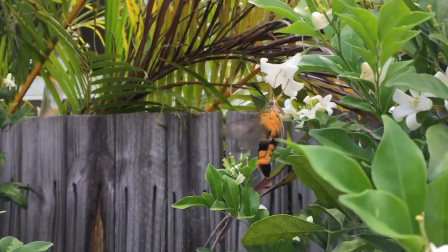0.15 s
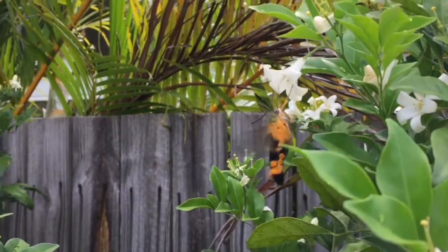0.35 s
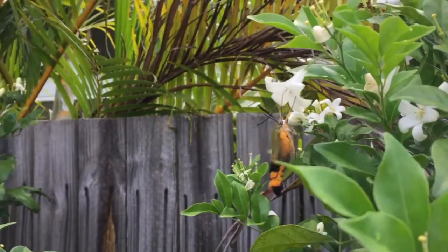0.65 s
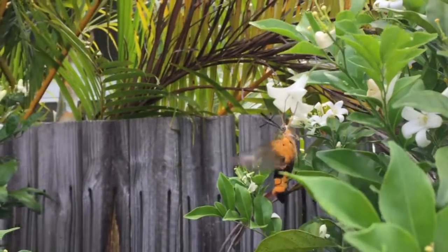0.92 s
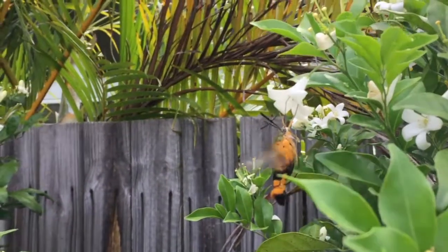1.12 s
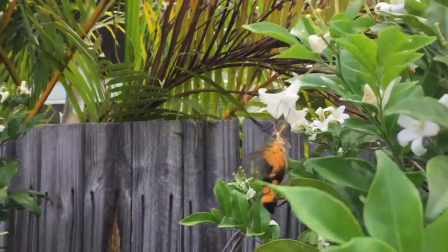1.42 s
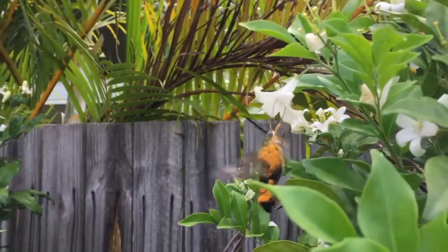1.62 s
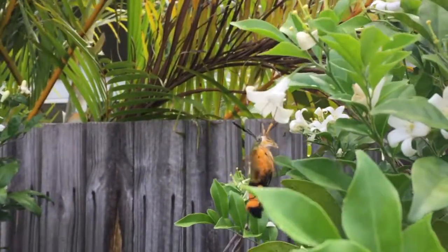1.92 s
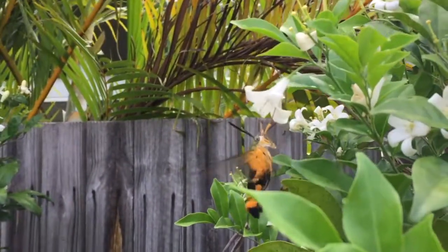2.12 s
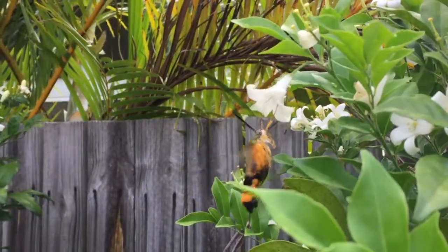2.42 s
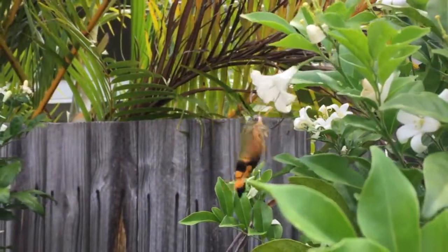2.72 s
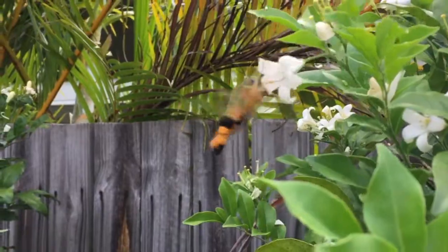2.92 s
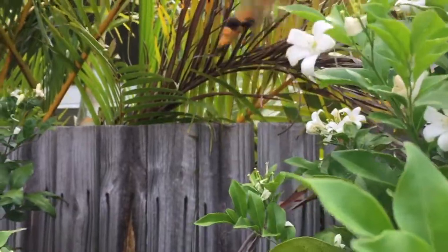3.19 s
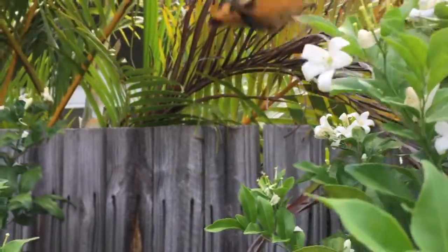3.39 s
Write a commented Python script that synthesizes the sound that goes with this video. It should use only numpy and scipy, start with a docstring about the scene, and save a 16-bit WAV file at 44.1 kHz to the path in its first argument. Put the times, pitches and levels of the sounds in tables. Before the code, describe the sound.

A moth's wings flutter with a low throb and dry ticks over a distant outdoor rumble.

```python
"""A flower garden: a hawk moth hovers, then lifts off, brushes the leaves and sweeps close by.
Each wingbeat pushes a pulse of air, heard as a low throb, and each stroke ends in a dry tick,
plainer as the moth nears. Behind it far traffic rumbles and swells, a motor hums and whines,
and insects give a few faint, thin calls over the hiss of still air."""
import sys
import numpy as np
from scipy import signal
from scipy.fft import rfft, irfft
from scipy.io import wavfile

SR = 44100
rng = np.random.default_rng(int(sys.argv[2]) if len(sys.argv) > 2 else 0)


def wrap_up_sound(samples):
    """Save the sound to the file named by the first command line argument, as 16-bit audio."""
    columns = np.atleast_2d(samples).T
    # keep every value between -1 and 1, then stretch to whole-number steps
    tamed = np.clip(columns, -1, 1)
    steps = np.round(tamed * 32767).astype(np.int16)
    wavfile.write(sys.argv[1], SR, steps)


N = 156555

# The pace of the wings: time_s, beat_rate_hz
WINGBEAT = [(0, 54.5), (2.3, 55), (2.65, 56.5), (2.9, 54.5), (3.0, 62), (3.07, 61.3), (3.13, 57.5),
            (3.21, 62.5), (3.29, 58.5), (3.38, 58.8), (3.44, 53), (3.47, 55), (3.51, 62), (3.55, 66)]
def wingbeats(downstroke_at_s=3.2028):
    """Running count of wingbeats, timed so that a downstroke lands on the hardest flick."""
    beats = np.cumsum(in_time(WINGBEAT)) / SR
    return beats + 1 - np.interp(downstroke_at_s, seconds(), beats) % 1


# The throb's swells and dips: time_s, level_db
THROB_LEVEL = [(0, -61), (2.65, -62.5), (2.86, -50.5), (3.0, -58), (3.2, -66), (3.36, -46.5), (3.45, -62),
               (3.52, -45.5), (3.55, -48)]
# Its harmonics, fundamental first: relative_level_db
THROB_HARMONICS = [-1.5, -5, -14, -20.5]
def wing_throb(sway_db=1.5):
    """The moth's low end: one pulse of air per beat, each harmonic wavering on its own."""
    phase = 2 * np.pi * wingbeats()
    throb = sum(-from_db(db + sway_db * drift(12)) * np.cos(k * phase)
                for k, db in enumerate(THROB_HARMONICS, 1))
    return from_db(in_time(THROB_LEVEL)) * rms_one(throb)


# The ticks build as the moth nears: time_s, level_db
TICK_LEVEL = [(0, -84.5), (2.2, -81.5), (2.6, -77), (2.75, -77.5), (2.97, -73.5), (3.06, -74), (3.14, -73),
              (3.24, -72), (3.31, -74), (3.38, -72), (3.46, -74), (3.51, -68), (3.55, -64)]
# Bright, dry colour shared by ticks, flicks and rush: frequency_hz, density_db
WING_COLOUR = [(1200, -14), (3200, 3), (6000, -1.5), (8000, -2.5), (10000, -0.5), (13000, -1), (15500, 3)]
def wing_ticks(decay_s=.0009, spread_db=1.2, upstroke_db=-3, rustle_db=-16):
    """Downstroke and softer upstroke each end in a dry tick over a faint rustle."""
    strokes = 2 * wingbeats()
    stroke = strokes.astype(int)
    age_s = (strokes - stroke) / (2 * in_time(WINGBEAT))
    accent_db = spread_db * rng.standard_normal(1000)[stroke] + upstroke_db * (stroke % 2)
    envelope = rms_one(from_db(accent_db) * np.exp(-age_s / decay_s) + from_db(rustle_db))
    return from_db(in_time(TICK_LEVEL)) * envelope * noise(WING_COLOUR)


# Sharp accents among the ticks: start_s, level_db, low_cut_hz
FLICKS = [(1.802, -68, 7000), (2.253, -66, 11000), (2.3945, -61, 11000), (2.511, -66, 11000),
          (2.5645, -64, 12000), (2.6765, -58.5, 11000), (2.954, -60, 10000), (3.020, -63, 7000),
          (3.101, -62, 8000), (3.171, -63, 7000), (3.2025, -51.5, 6000), (3.235, -61, 9000),
          (3.3705, -61, 6000), (3.405, -61, 7000), (3.495, -60, 5000), (3.542, -54, 6000)]
def wing_flicks():
    """Now and then a wing snaps harder: light flicks are all treble, firm ones have more body."""
    out, rasp = np.zeros(N), noise(WING_COLOUR)
    for start_s, db, low_cut_hz in FLICKS:
        low_cut = signal.butter(2, low_cut_hz, "high", fs=SR, output="sos")
        envelope = snap(start_s, rise_s=.0005, decay_s=.0012)
        out += from_db(db) * envelope * rms_one(signal.sosfilt(low_cut, rasp))
    return out


# Wing tips catch the leaves on the way up: start_s, level_db
BRUSHES = [(3.0455, -61.5), (3.0605, -61.5), (3.076, -66), (3.202, -67.5), (3.2595, -63), (3.362, -65)]
# The leaf's softer colour: frequency_hz, density_db
BRUSH_COLOUR = [(1000, -25), (2500, -6), (3800, 0), (6000, -5), (9000, -11), (15000, -15)]
def leaf_brushes():
    """A wing tip grazing a leaf gives a duller, longer tick."""
    envelope = sum(from_db(db) * snap(start_s, rise_s=.0018, decay_s=.0028) for start_s, db in BRUSHES)
    return envelope * noise(BRUSH_COLOUR)


def air_rush(closest_s=3.545, peak_db=-66, rise_db_per_s=130):
    """Stirred air fills the gaps between strokes as the moth closes in."""
    level_db = peak_db - rise_db_per_s * np.abs(seconds() - closest_s)
    return from_db(level_db) * noise(WING_COLOUR)


# The traffic's dark bed: frequency_hz, density_db
RUMBLE_COLOUR = [(20, -45), (32, -25), (44, -0.5), (60, -0.5), (80, -2), (105, -9), (140, -11), (180, -14),
                 (230, -19.5), (320, -24.5), (500, -37.5), (1000, -52.5)]
# A deep boom swelling inside it: time_s, level_db
BOOM_LEVEL = [(0, -62), (.45, -61), (.7, -72), (1.45, -68), (1.65, -50), (1.83, -59), (2.07, -49),
              (2.25, -54), (2.4, -51), (2.6, -62), (3.55, -70)]
# The midrange wash of tyres: frequency_hz, density_db
TYRE_COLOUR = [(150, -6), (350, -2), (540, 0.5), (700, 1.5), (880, 2), (1150, 0), (1500, -2.5), (2100, -9),
               (3000, -13.5), (4200, -18), (4800, -23.5), (8000, -34.5)]
# The wash's gentle rise and fall: time_s, level_db
TYRE_LEVEL = [(0, -63), (.5, -62), (.9, -61.8), (1.3, -61.5), (1.85, -62), (2.15, -62), (2.3, -63),
              (2.7, -61.5), (2.95, -62), (3.2, -61.5), (3.55, -61.5)]
def far_traffic(rumble_db=-52.3, sway_db=.5, boom_hz=47.8):
    """Distant traffic blends into a rumble, a deep pitched boom and a wash of tyre noise."""
    rumble = from_db(rumble_db + sway_db * drift(1.2)) * noise(RUMBLE_COLOUR)
    boom = from_db(in_time(BOOM_LEVEL)) * tone(boom_hz)
    tyres = from_db(in_time(TYRE_LEVEL)) * noise(TYRE_COLOUR)
    return rumble + boom + tyres


# Cars go by far off, tyres singing: nearest_s, half_length_s, pitch_hz, level_db
PASSES = [(0.27, 0.04, 900, -66.5), (0.79, 0.1, 1280, -70), (1.0, 0.06, 950, -67), (1.28, 0.095, 1200, -65),
          (1.71, 0.07, 1200, -66), (1.91, 0.06, 950, -62.5)]
def passing_cars(skirt_db_per_octave=-24):
    """Each pass is a brief swell of tyre noise that falls away on both sides of one pitch."""
    out = np.zeros(N)
    for nearest_s, half_length_s, hz, db in PASSES:
        band = [(hz * 2. ** octave, skirt_db_per_octave * abs(octave)) for octave in (-4, 0, 4)]
        swell = np.exp(-.5 * ((seconds() - nearest_s) / half_length_s) ** 2)
        out += from_db(db) * swell * noise(band)
    return out


# The swells of the motor's low drone: time_s, level_db
DRONE_LEVEL = [(0, -70), (.3, -63), (.58, -56), (.8, -65), (1.6, -58.5), (1.92, -49), (2.12, -56),
               (2.35, -53), (2.8, -61), (3.55, -67.5)]
# Its clearest note: time_s, level_db
MAIN_NOTE_LEVEL = [(0, -71), (1.25, -68.5), (1.75, -70), (1.92, -66.5), (2.05, -70.5), (2.7, -72),
                   (3.55, -72)]
# The body of the hum: pitch_hz, level_db
HUM_PARTIALS = [(122.5, -65.5), (135, -64.5), (152.7, -65), (200.2, -68), (204.6, -74), (255.5, -72.5),
                (291, -78.5), (409.1, -75), (460.2, -77), (511.4, -80), (613.7, -75.5), (846, -79.5),
                (869, -80), (920, -82.5)]
# The thin whine above: pitch_hz, level_db
WHINE_PARTIALS = [(3784, -94), (3833, -95), (3881, -95), (4192, -89.5), (5706, -99), (5803, -93),
                  (5905, -97), (6304, -100)]
# The top note crossfades up a step: start_s, end_s, pitch_hz, level_db
TOP_NOTES = [(0, 1.5, 9787, -86), (1.2, 3.4, 9991, -88.8)]
def motor(drone_hz=89.7, main_note_hz=818.3, fade_s=.3):
    """A far motor: a swelling drone, steady hum and whine, and a top note that steps up."""
    out = from_db(in_time(DRONE_LEVEL)) * tone(drone_hz)
    out += from_db(in_time(MAIN_NOTE_LEVEL)) * tone(main_note_hz)
    out += sum(from_db(db) * tone(hz) for hz, db in HUM_PARTIALS)
    out += sum(from_db(db) * tone(hz, sway_db=1.8) for hz, db in WHINE_PARTIALS)
    t = seconds()
    for start_s, end_s, hz, db in TOP_NOTES:
        fade = np.clip(np.minimum(t - start_s, end_s - t) / fade_s, 0, 1)
        out += from_db(db) * fade * tone(hz, sway_db=.7)
    return out


# Faint, high calls: start_s, length_s, pitch_hz, level_db
INSECT_CALLS = [(.12, .13, 12020, -84), (.29, .17, 14450, -84.5), (.59, .1, 12220, -88),
                (.60, .1, 6550, -86), (.67, .14, 12100, -88), (2.04, .16, 7520, -87)]
def insects(rasp_hz=110):
    """Short, thin notes that swell and fade, roughened by a fast random flutter."""
    t, out = seconds(), np.zeros(N)
    for start_s, length_s, hz, db in INSECT_CALLS:
        swell = np.sin(np.pi * np.clip((t - start_s) / length_s, 0, 1))
        out += from_db(db) * swell * rms_one(drift(rasp_hz) * np.sin(2 * np.pi * hz * t))
    return out


# The colour of the quiet: frequency_hz, density_db
HISS_COLOUR = [(2000, 7.5), (4800, -2.5), (5600, 6), (6500, 5), (7700, -6), (9000, 2), (9900, 1),
               (10300, -32), (11200, -5.5), (12200, 1.5), (15500, -5.5)]
def still_air(level_db=-78.5):
    """A thin, even hiss behind everything."""
    return from_db(level_db) * noise(HISS_COLOUR)


def from_db(db):
    """Decibels to gain."""
    return 10 ** (np.asarray(db) / 20)


def rms_one(x):
    """Scale to unit power."""
    return x / np.sqrt(np.mean(x ** 2) + 1e-20)


def seconds():
    """Time of each sample."""
    return np.arange(N) / SR


def in_time(rows):
    """An automation curve: straight lines through (time_s, value) rows."""
    return np.interp(seconds(), *np.transpose(rows))


def drift(rate_hz):
    """Smooth random modulation of unit spread, rolling off above rate_hz."""
    hop, settle = 40, 2000  # samples per control step; steps for the filter to settle
    pole = np.exp(-2 * np.pi * rate_hz * hop / SR)
    white = rng.standard_normal(N // hop + settle + 2)
    smooth = signal.lfilter([1], [1, -2 * pole, pole * pole], white)[settle:]
    return np.interp(np.arange(N) / hop, np.arange(len(smooth)), rms_one(smooth))


def noise(colour):
    """Noise of unit power, shaped by (frequency_hz, density_db) rows."""
    hz, db = np.transpose(colour)
    bins_hz = np.maximum(np.arange(N // 2 + 1) * SR / N, 1)
    gain = from_db(np.interp(np.log(bins_hz), np.log(hz), db))
    return rms_one(irfft(rfft(rng.standard_normal(N)) * gain, N))


def tone(hz, sway_db=.73, wander_hz=.41):
    """A partial of unit power that wavers a little in pitch and level."""
    turns = np.cumsum(hz + wander_hz * drift(2.09)) / SR + rng.random()
    return rms_one(np.sin(2 * np.pi * turns) * from_db(sway_db * drift(1.5)))


def snap(start_s, rise_s, decay_s):
    """Envelope of a light contact: quick attack, exponential tail."""
    age_s = np.maximum(seconds() - start_s, 0)
    return np.minimum(age_s / rise_s, 1) * np.exp(-np.clip((age_s - rise_s) / decay_s, 0, 20))


def scene():
    """The mono mix: the moth up front, the garden behind."""
    moth = wing_throb() + wing_ticks() + wing_flicks() + leaf_brushes() + air_rush()
    garden = far_traffic() + passing_cars() + motor() + insects() + still_air()
    return (moth + garden)[None]


def record(dry, cutoff_hz=15750):
    """A steep high cut takes off the very top."""
    return signal.sosfilt(signal.ellip(12, .1, 70, cutoff_hz, fs=SR, output="sos"), dry)


dry = scene()
out = record(dry)
wrap_up_sound(out)
```